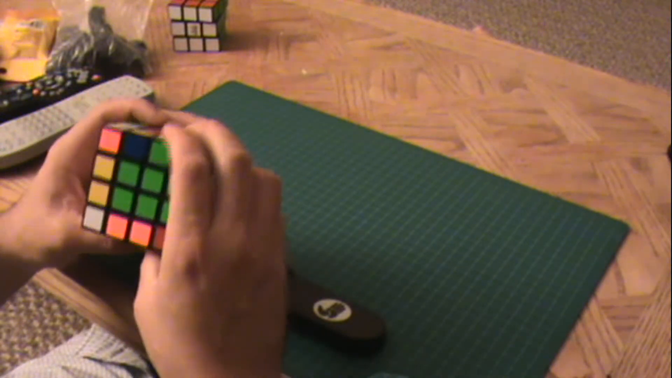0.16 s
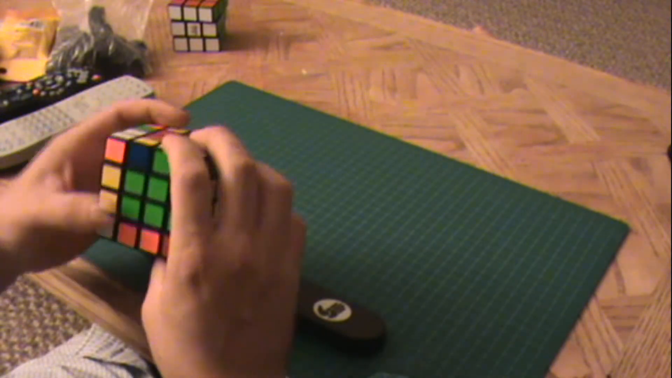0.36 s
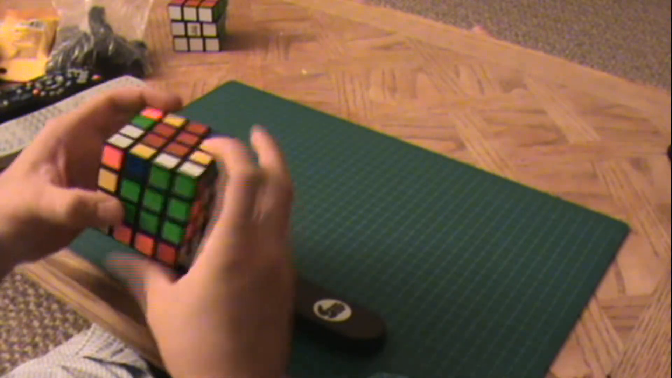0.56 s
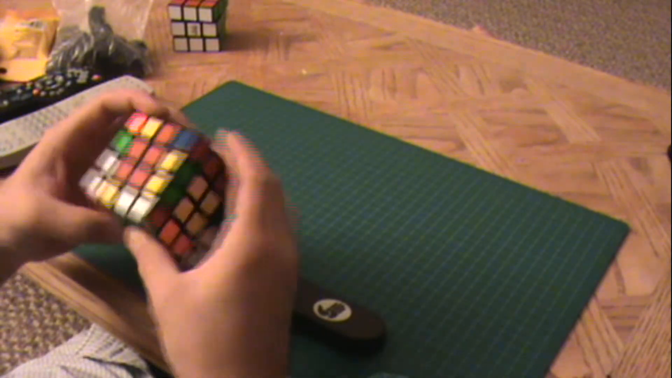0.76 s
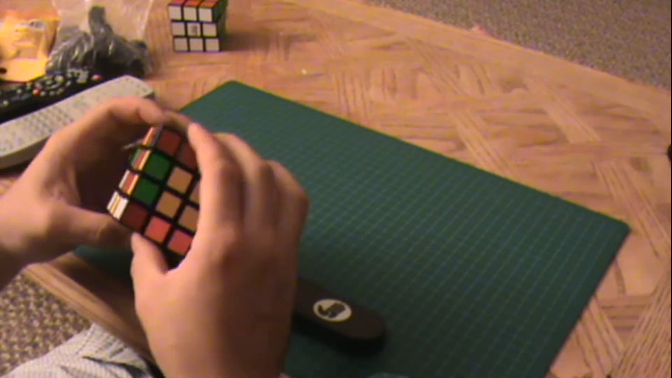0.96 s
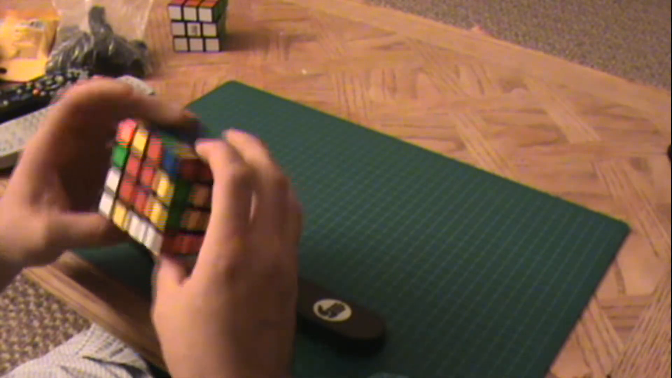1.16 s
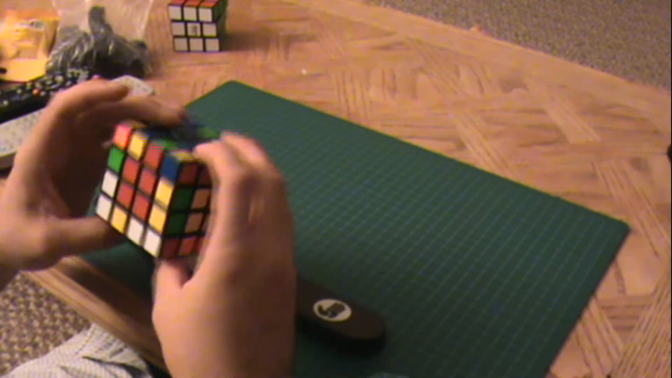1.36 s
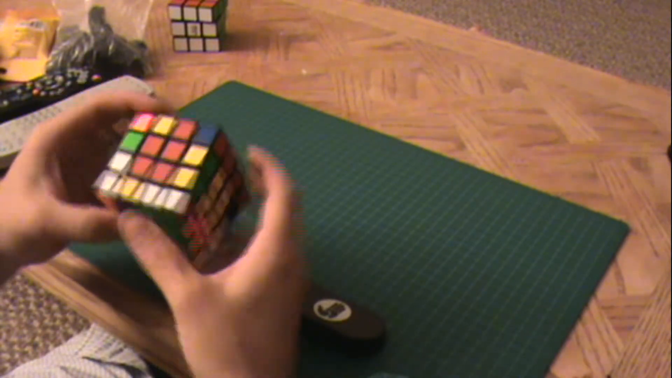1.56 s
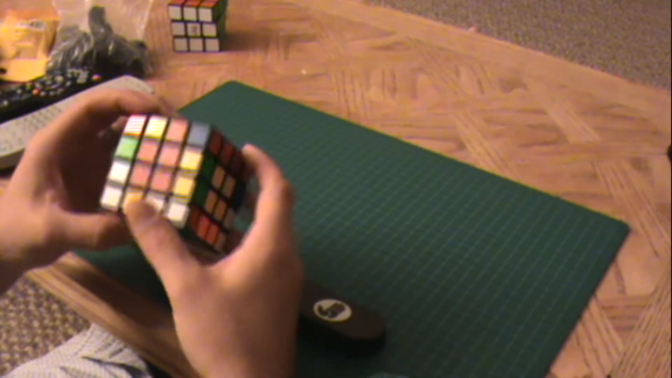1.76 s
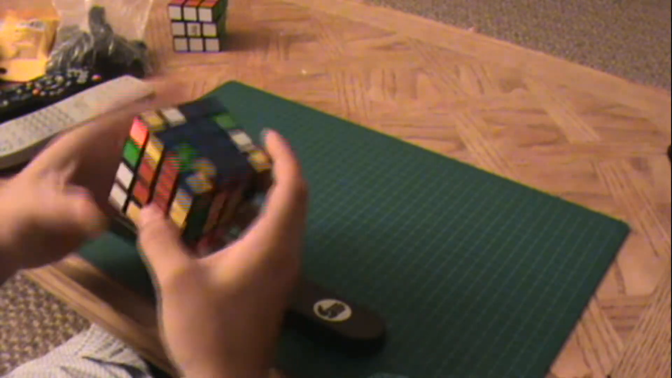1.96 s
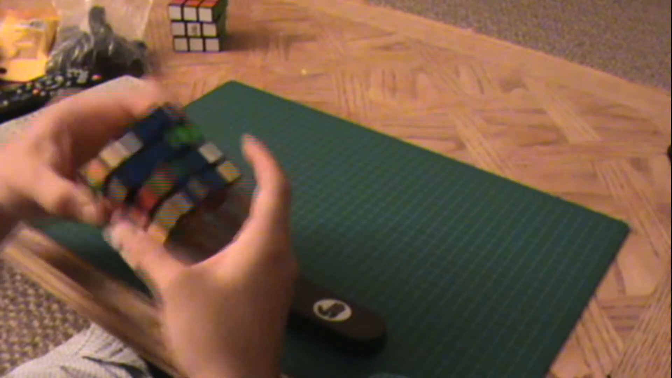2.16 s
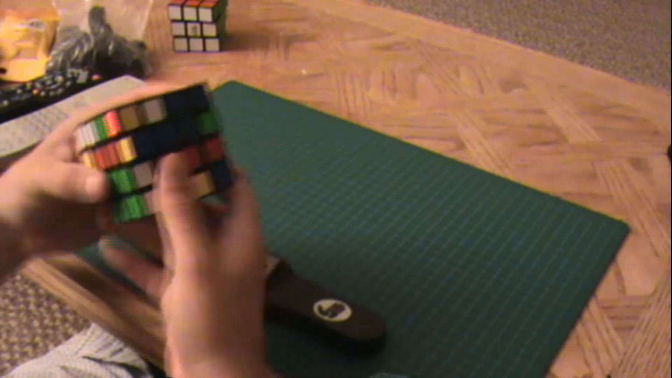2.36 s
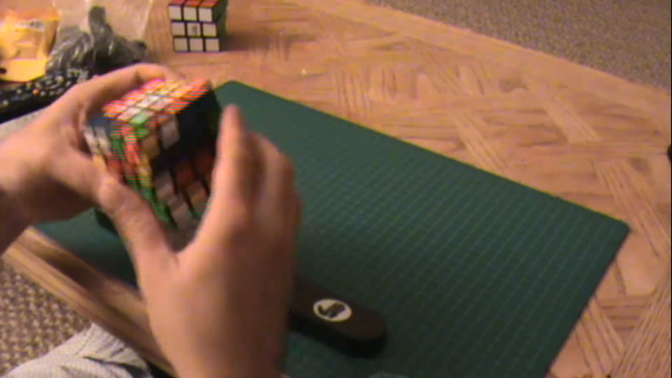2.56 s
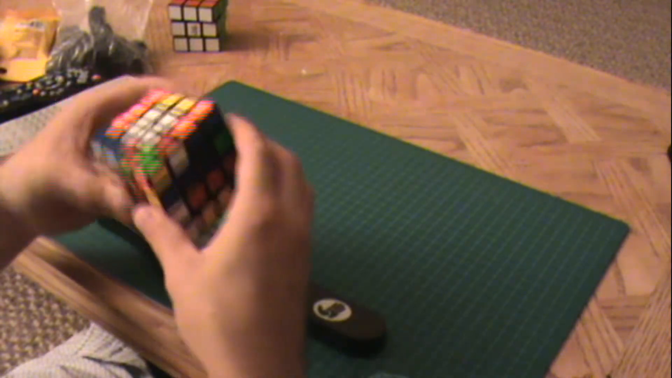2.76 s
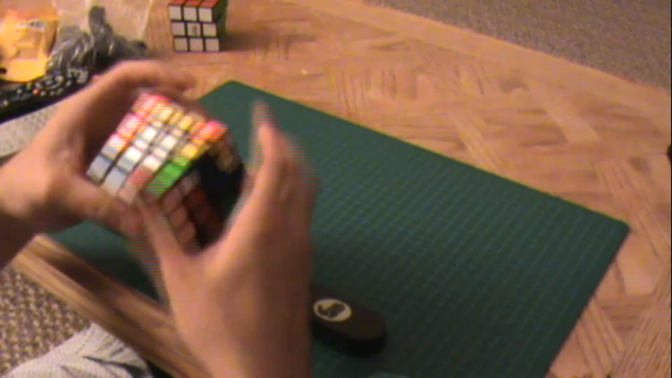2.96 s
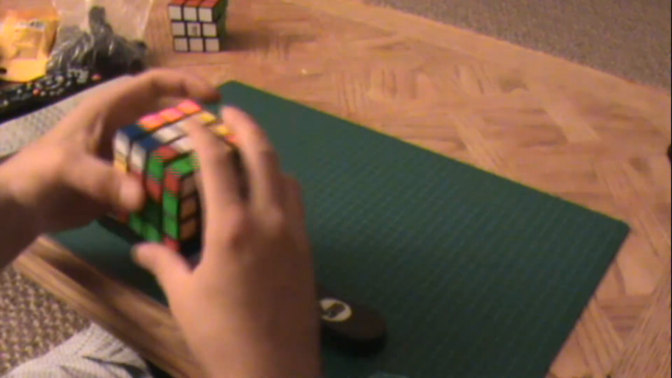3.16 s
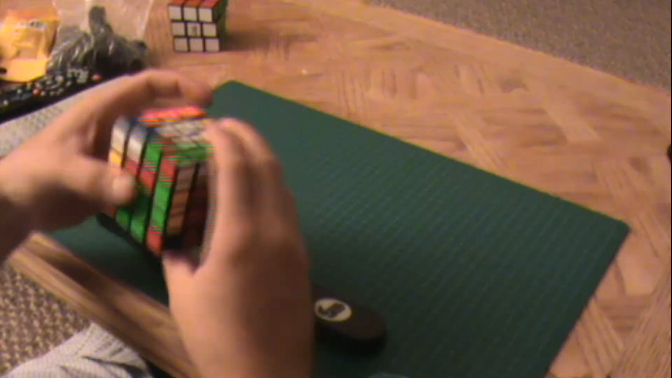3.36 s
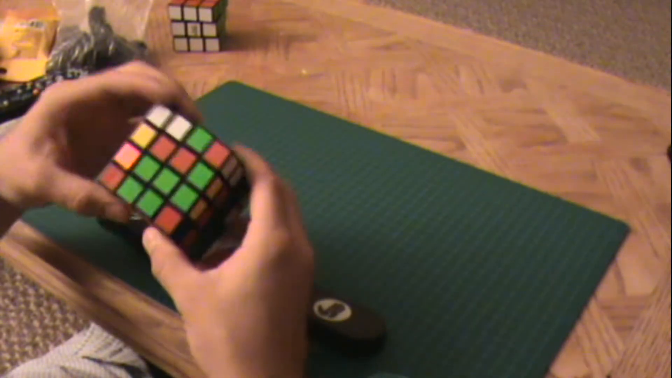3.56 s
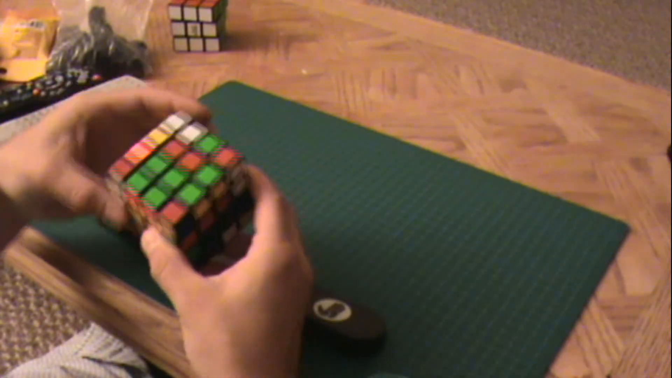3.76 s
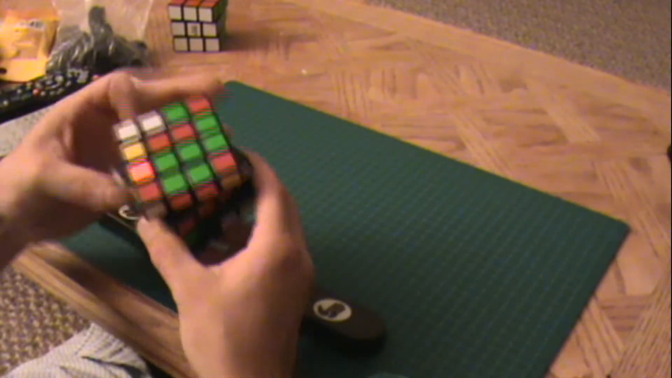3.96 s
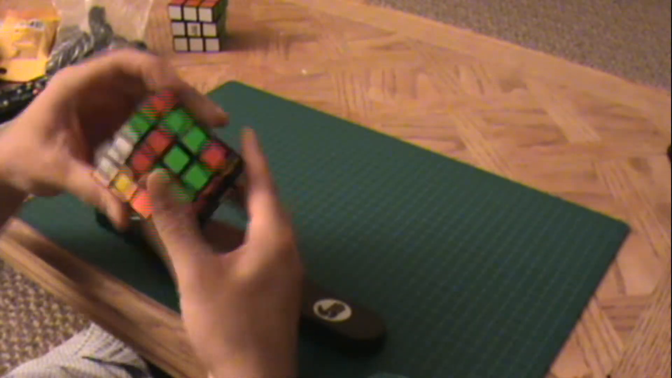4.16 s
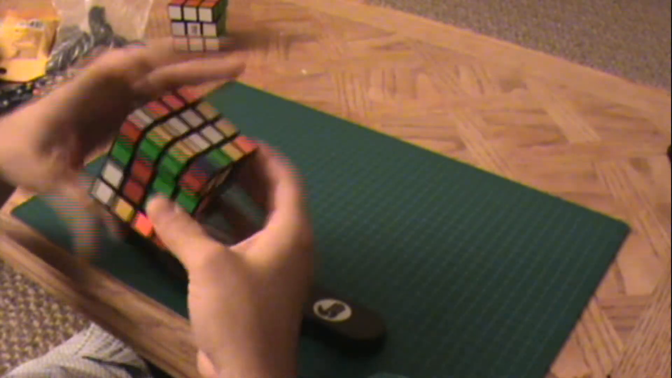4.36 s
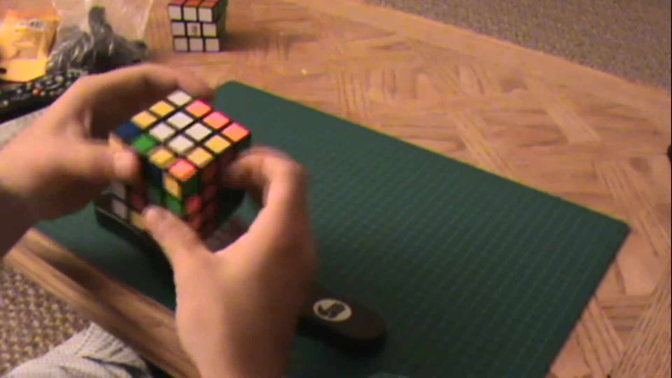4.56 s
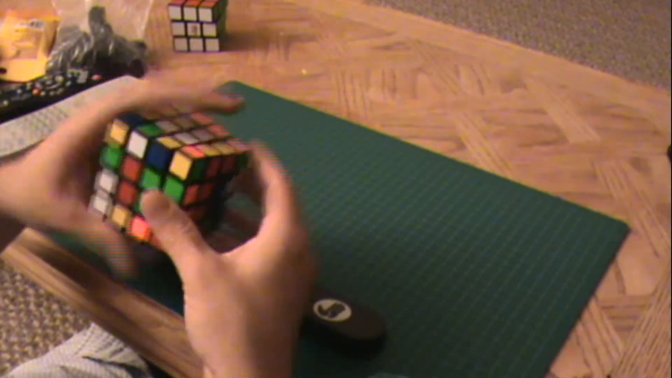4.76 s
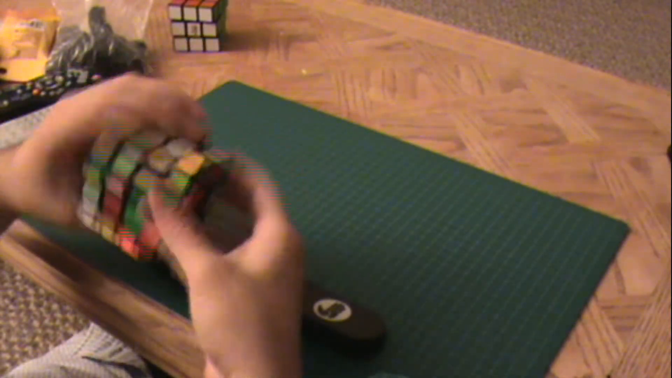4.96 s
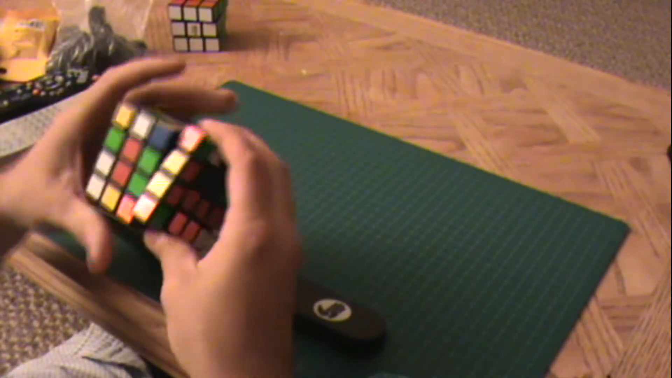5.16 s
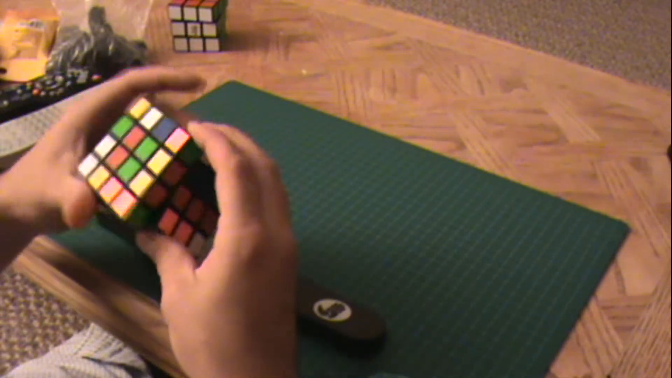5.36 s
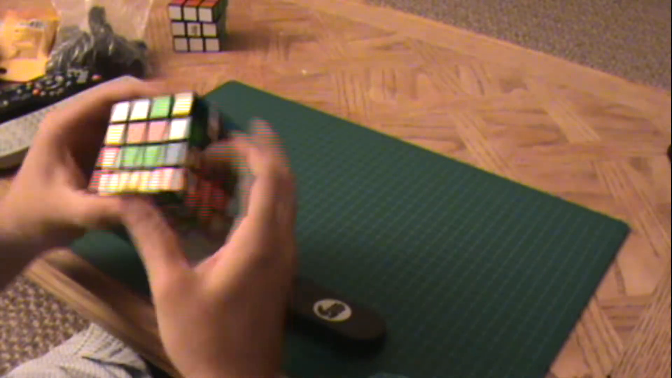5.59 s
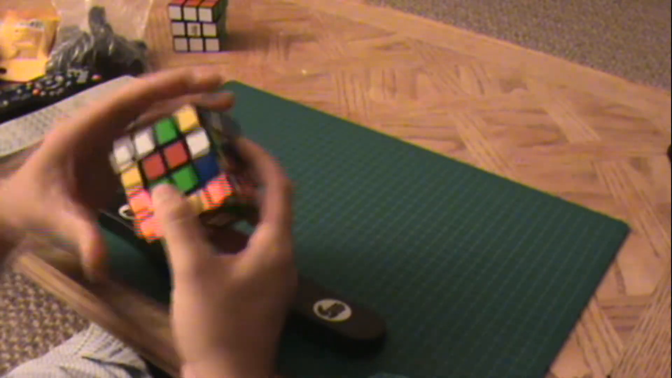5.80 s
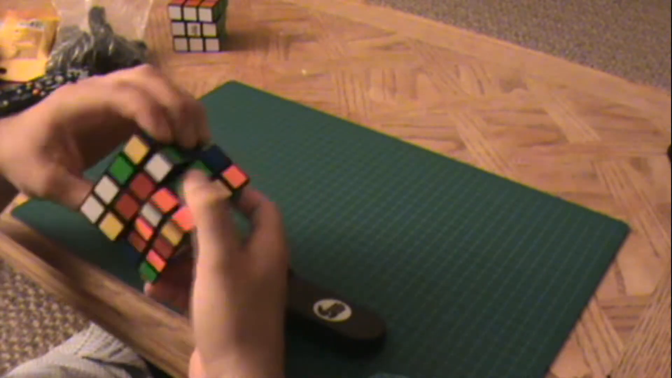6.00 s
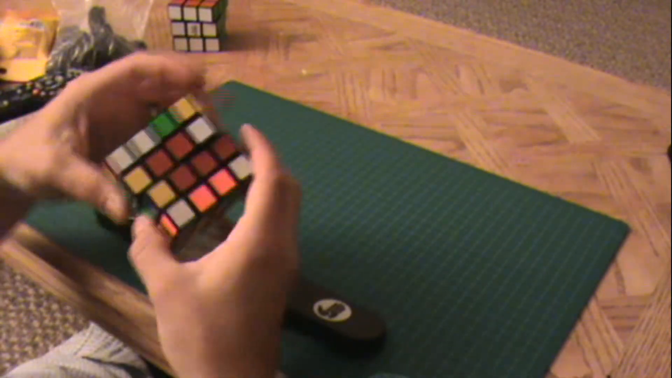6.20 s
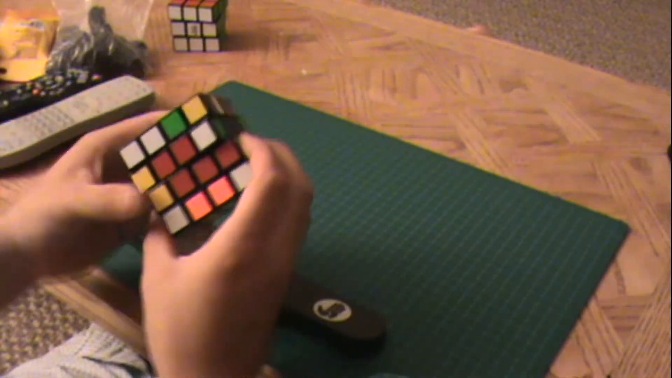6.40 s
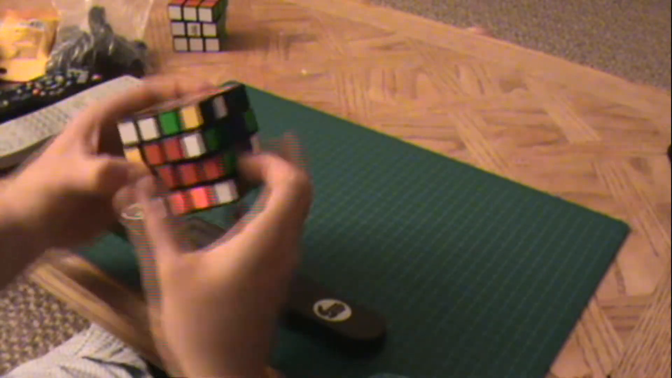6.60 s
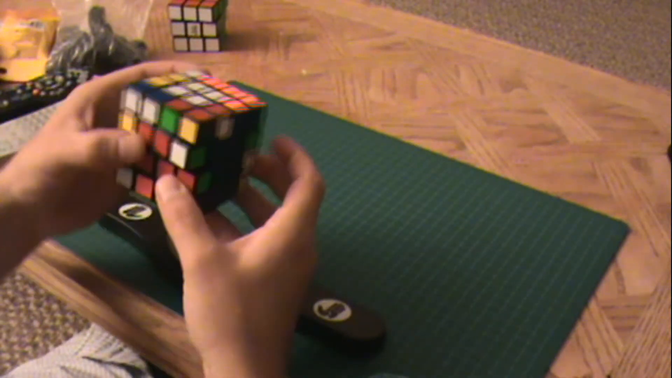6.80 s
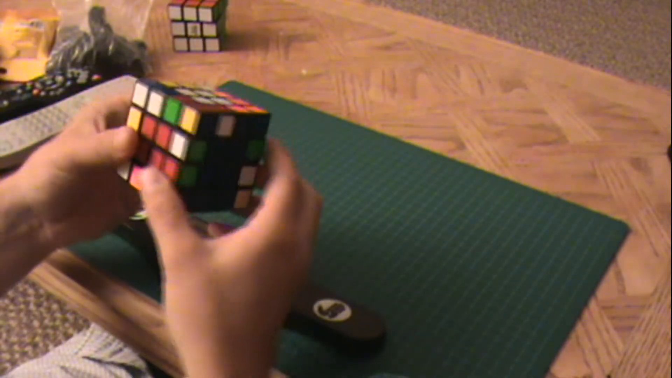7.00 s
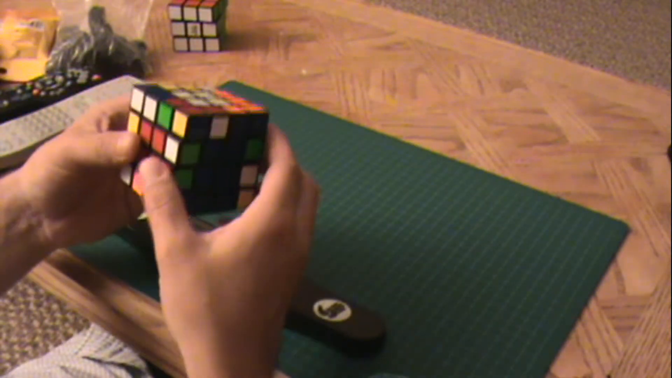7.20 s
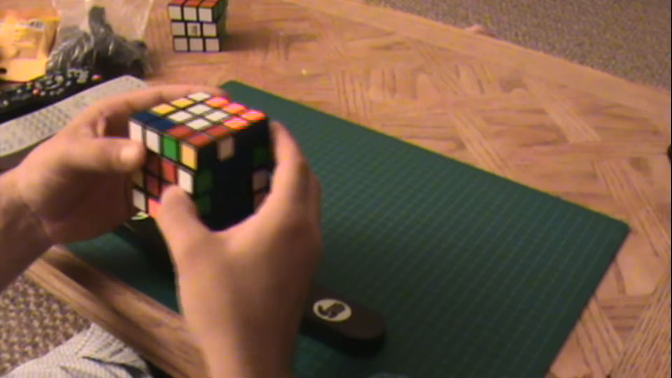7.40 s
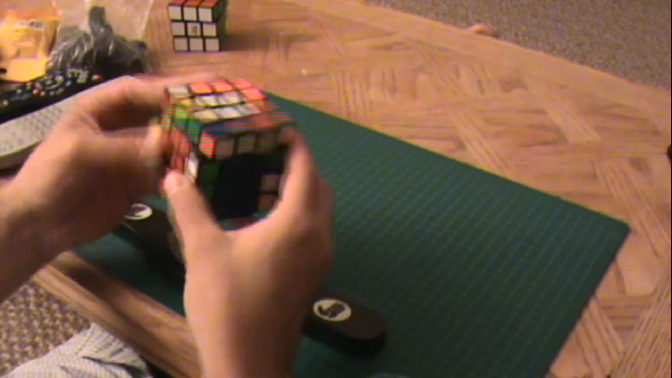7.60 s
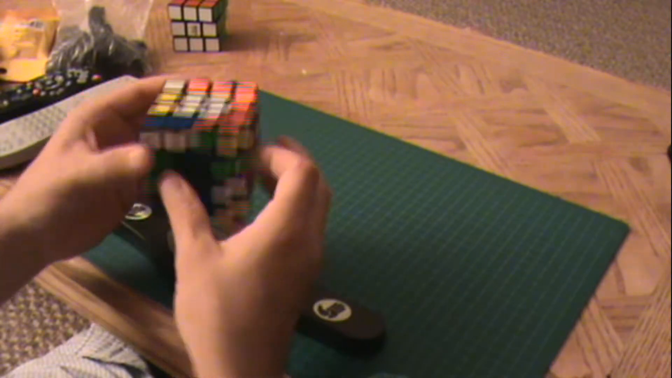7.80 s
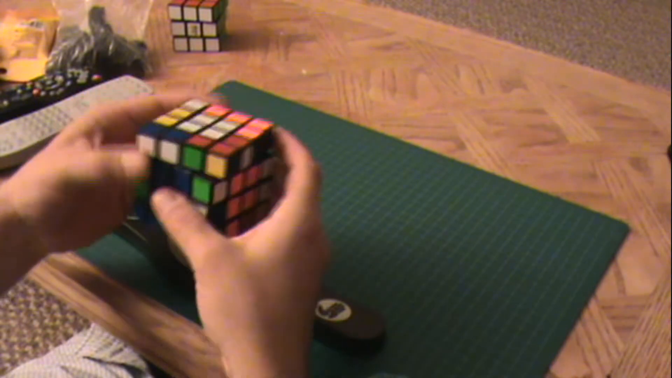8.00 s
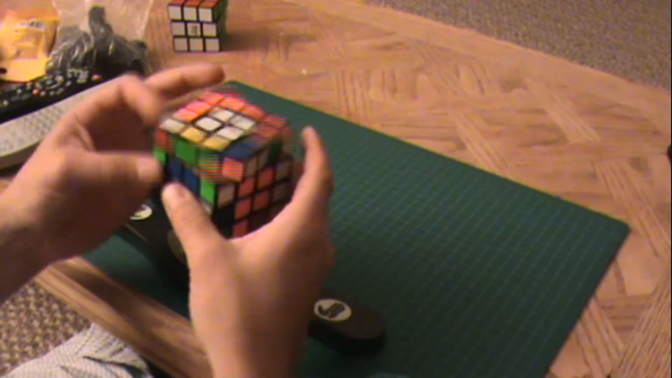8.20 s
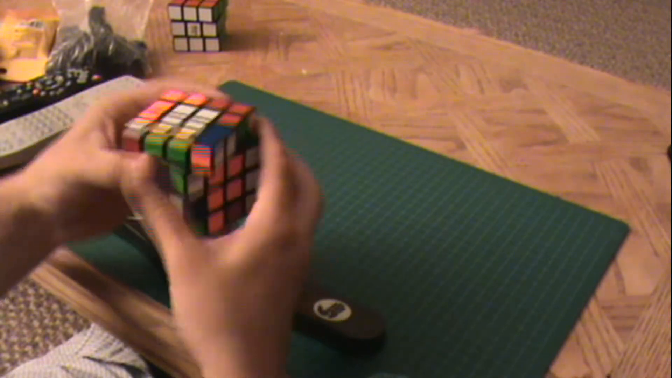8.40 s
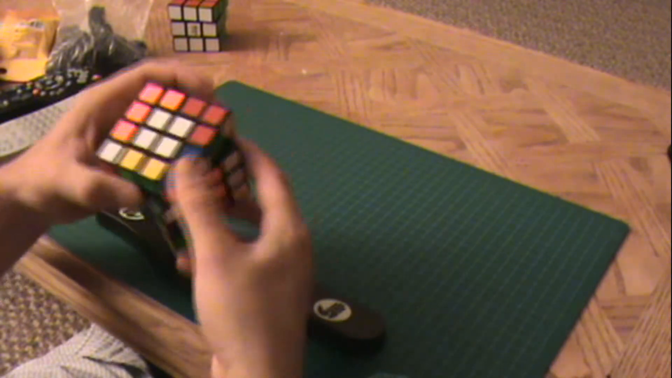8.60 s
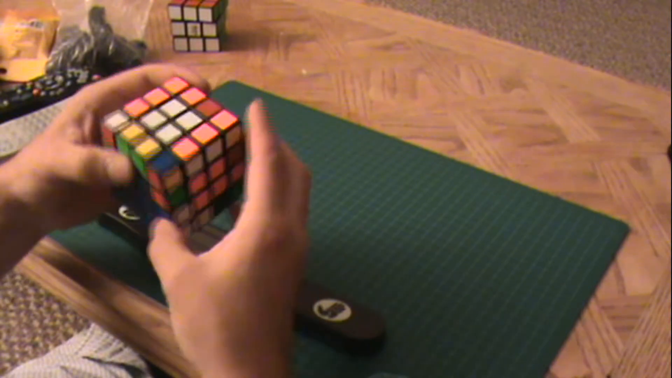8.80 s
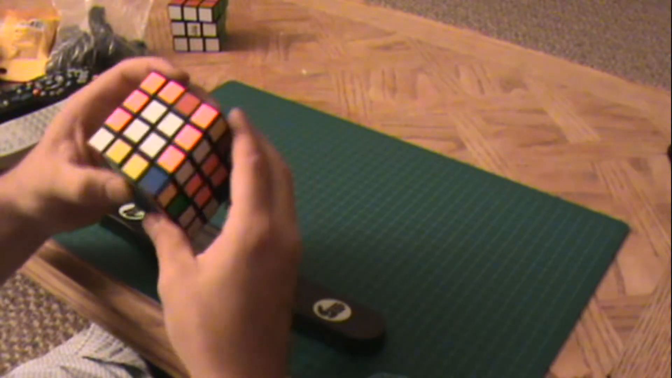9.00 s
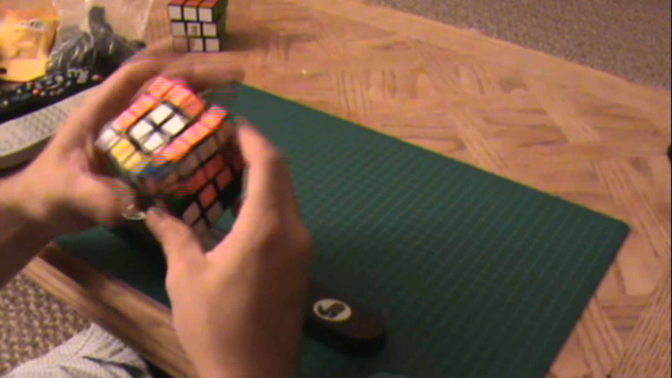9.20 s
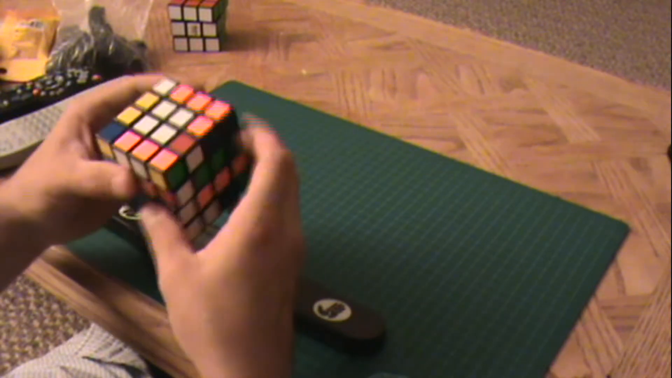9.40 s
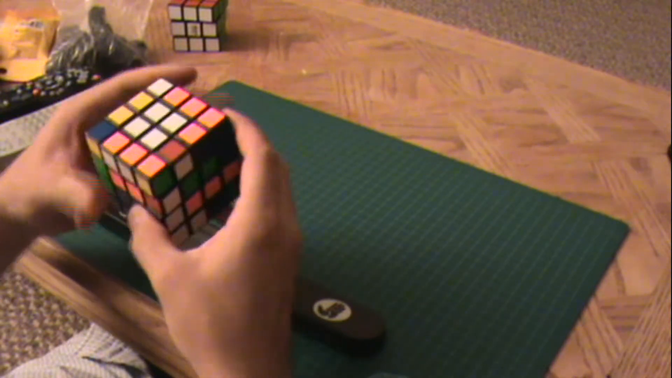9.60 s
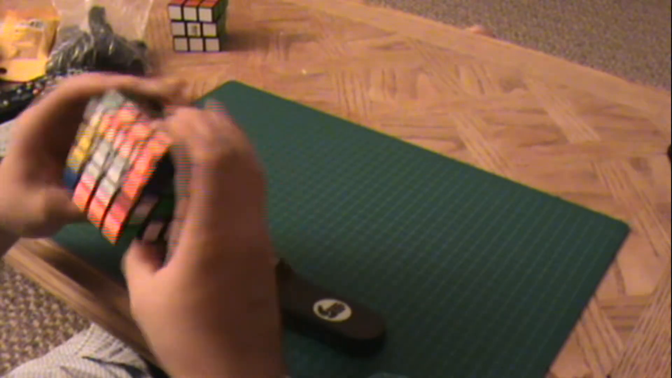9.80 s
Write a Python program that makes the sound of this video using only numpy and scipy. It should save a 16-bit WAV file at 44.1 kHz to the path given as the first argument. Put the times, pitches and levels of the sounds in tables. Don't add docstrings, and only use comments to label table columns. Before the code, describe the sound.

A plastic puzzle cube is turned by hand about half a metre from a stereo microphone in a small, quiet carpeted room. For the first 0.7 s there are only tiny ticks and soft finger rubbing; a sharp snap comes at about 0.75, then lighter clicks until 2. Clacks cluster at 2.1-2.25 and harder at 2.9, with single snaps near 3.15 and 3.45. Tight bursts follow around 3.95, 4.5 (strong), 4.85-5.1 and 5.4, with a dull finger rub near 5.6, then a rapid run at 6.0-6.2. From 6.3 to 7.6 it is mostly faint ticks and pats. A loud cluster hits at 7.65, others at 8.25, 8.5 and 8.75, a sharp crack at 9.3, then light clicks to the end. Bright short snaps mix with hollow knocks, brief pings and rattles. Short echoes, steady low hum, airy hiss and a faint, very high whine remain underneath.

```python
import sys
import numpy as np
from scipy import signal
from scipy.fft import rfft, irfft
from scipy.io import wavfile
from scipy.ndimage import uniform_filter1d

SR = 44100
rng = np.random.default_rng(int(sys.argv[2]) if len(sys.argv) > 2 else 0)


def boost(x):
    u = np.asarray(x, float) / 20
    return 10 ** u


def materialize(psi):
    bounded = np.clip(np.atleast_2d(psi).T, -1, 1)
    quanta = np.round(bounded * 32767).astype(np.int16)
    wavfile.write(sys.argv[1], SR, quanta)


N = 434385

# f/Hz, level/dB
SNAP_COLOUR = [(1300, -18.5), (2500, -11.5), (4500, -4.5), (8000, -5.5), (11000, -11.5), (13500, -22),
               (16000, -25)]
CLACK_MS = 2.3


def on_log(table, hz):
    table = np.array(table, float)
    return np.interp(np.log(np.maximum(hz, 1)), np.log(table[:, 0]), table[:, 1])


def shape(x, response):
    size = x.shape[-1]
    hz = np.arange(size // 2 + 1) * SR / size
    return irfft(rfft(x) * response(hz), size)


def level(x, db):
    return x * boost(db) / np.sqrt(np.mean(x ** 2))


def diffuse(size, narrow_db):
    # f/Hz, side minus mid/dB
    width = [(60, -18), (120, -12), (200, -3), (700, 3.5), (2400, 1.9), (8000, -2), (15000, 1)]
    mid, side = rng.standard_normal((2, size))
    side = shape(side, lambda hz: boost(on_log(width, hz) - narrow_db))
    return np.array([mid + side, mid - side])


def place_at(s, sounds):
    out = np.zeros(N + 2000)
    starts = (s[:, None] * SR).astype(int)
    np.add.at(out, starts + np.arange(sounds.shape[1]), sounds)
    return out[:N]


def rings(colour, tilt_db, spread_s, count, size, tau_s):
    t = np.arange(size) / SR
    pitch, late, strength = rng.random((len(tilt_db), 3, count, 1)).transpose(1, 0, 2, 3)
    place = (np.arange(count)[:, None] + pitch) / count
    lowest_hz, highest_hz = colour[0][0], colour[-1][0]
    hz = lowest_hz * (highest_hz / lowest_hz) ** place
    age = np.maximum(t - spread_s[:, None, None] * late, 0)
    tilt = tilt_db[:, None, None] * (place - .5)
    gain = boost(on_log(colour, hz) + tilt + 11.5 * (strength - .5))
    decay = np.exp(-age / tau_s * 3 ** (place - .5))
    ring = (gain * decay * np.sin(2 * np.pi * hz * age)).sum(axis=1)
    peak_power = uniform_filter1d(ring ** 2, size=60).max(axis=1, keepdims=True)
    return ring / np.sqrt(2 * peak_power)


def struck(table, ratios, tau_s, gain_db):
    s, db, hz = np.transpose(table)
    t = np.arange(600) / SR
    ring = sum(np.sin(2 * np.pi * ratio * hz[:, None] * t) for ratio in ratios)
    onset = np.minimum(t / .00034, 1)
    return place_at(s, boost(db + gain_db)[:, None] * ring * np.exp(-t / tau_s) * onset / 2)


def background():
    # f/Hz, level per Hz/dB
    air = [(20, -7.5), (50, 1.5), (120, -6), (500, -10), (1800, -12.5), (5500, -18.5), (10000, -22.5),
           (16000, -23.5)]
    # level/dB, side level/dB, waver (0-1)
    tone_levels = [(-65.5, -18, .2), (-68.5, -16, .25), (-71.5, -5, .15), (-72, -5, .15), (-77, -5, .15),
                   (-65.5, 2.5, .06), (-75, 2.5, .15)]
    tone_hz = [
        70.0,
        120.0,
        350,
        409,
        840,
        15735,
        15722.2,
    ]
    sound = level(shape(diffuse(N, narrow_db=-0.5), lambda hz: boost(on_log(air, hz))), -55.5)
    t = np.arange(N) / SR
    for hz, (db, side_db, waver) in zip(tone_hz, tone_levels):
        drift = uniform_filter1d(rng.standard_normal((2, N)), size=2000)
        drift = uniform_filter1d(drift, size=2000)
        strength = np.sqrt(2) * boost(db) * (1 + waver * drift / drift.std())
        mid, side = strength * np.sin(2 * np.pi * hz * t + np.array([[0], [1.3]]))
        sound = sound + mid + boost(side_db) * side * np.array([[1], [-1]])
    return sound


def fingers():
    # t/s, drag level/dB
    handling = [(0, -56), (.35, -60), (.72, -44.5), (1.3, -51), (1.9, -83), (2.9, -48), (3.25, -50),
                (3.801, -70), (4.4, -45.5), (5.05, -57), (5.3, -72), (5.58, -39), (5.85, -85), (6.15, -46),
                (6.5, -85), (7.6, -62), (9.1, -62), (9.85, -68)]
    rub = shape(diffuse(N, narrow_db=10), lambda hz: 1 / (1 + 9j * (hz / 320 - 320 / (hz + 1)) / 11) ** 2)
    grip = np.repeat(rng.standard_normal(N // 900 + 1), 900)[:N]
    grip = uniform_filter1d(grip, size=900)
    drag_db = np.interp(np.arange(N) / SR, *np.transpose(handling))
    return level(rub, 0) * boost(2.2 * grip + drag_db - 15)


def hits():
    # t/s, level/dB, hollow knock over snap/dB, brightness/dB
    cracks = [(.756, -25.5, -18, 16), (0.7656, -22, -39, 6), (1.1949, -31.5, -2, 12),
              (1.5557, -31.5, -19, 9), (1.966, -30, -21, 7), (2.208, -24, -26, 12),
              (2.2125, -19.5, -31, 12), (2.617, -28.5, -32, 3), (2.8541, -29, -11, 0),
              (3.1562, -19.5, -30, 20), (3.895, -25, -8, -3), (3.956, -20.5, -26, -3),
              (3.9789, -19, -26, 25), (4.7416, -20, -39, 12), (4.8537, -20.5, -16, 8),
              (4.855, -21.5, -27, 18), (4.9611, -28, -12, 1), (5.0276, -22.5, -24, -6),
              (5.964, -26.5, -28, -6), (6.464, -29.5, -6, 7), (7.632, -24, -12, -5), (7.664, -11.5, -29, 4),
              (7.8292, -27, -31, 3), (8.2434, -19, -19, -6), (8.4664, -28.5, -6, 6), (8.629, -27.5, -29, 8),
              (8.996, -30.5, -30, -2), (9.2766, -27, -21, -1), (9.3232, -16.5, -38, 30),
              (9.481, -31.5, -5.5, 12)]
    # t/s, level/dB, hollow knock over snap/dB, brightness/dB
    clack_events = [(2.0937, -26.5, -9, 3), (2.2271, -23.5, -11, 3), (2.247, -19, -2, 1.5),
                    (2.867, -19.5, -25, -3), (2.893, -13, -26, 8), (2.923, -14.5, -3.5, 4),
                    (3.4285, -23, -3, 1), (3.9648, -15.5, -14, 12), (4.4861, -18, -10, 12),
                    (4.4926, -13, -5.5, 11), (4.5118, -11.5, -4.5, 10), (4.5282, -12.5, -10.5, 4),
                    (4.8595, -22.5, -8.5, 3), (5.055, -13.5, -25, -2), (5.0809, -14, -22, 6),
                    (5.137, -21, -6, -3), (5.4262, -16, -7.5, 5.5), (5.9951, -24, -8, -7),
                    (6.0227, -19, 2.5, -6.5), (6.138, -16, -5, 7), (6.161, -12, -21, 3.5),
                    (6.1761, -21, -33, -29), (6.202, -20, -23, 6), (8.2241, -20.5, -11, 1),
                    (8.2499, -15, -5.5, 5), (8.2751, -21.5, -7, 6.5), (8.4895, -21, -12.5, 6),
                    (8.7386, -20.5, -23, 1), (8.7574, -14, -2.5, 11), (8.7696, -13, -30, 11.5)]
    # t/s, level/dB, hollow knock over snap/dB, length/ms
    scuffles = [(1.6124, -34.5, -8, 5.4), (1.9709, -25, -3.5, 4), (2.8606, -25, 1, 3.4),
                (2.9102, -17, 1.5, 3.84), (3.1709, -26.5, -1, 2.75), (3.9404, -30.5, 4.5, 10.7),
                (3.9811, -27.5, 7, 6.9), (4.1623, -33, 1, 1.9), (4.496, -20, -18, 5.5),
                (4.5177, -25, -3, 5.8), (4.8644, -21, -8, 5.6), (4.9186, -23, -1.5, 3.8),
                (5.0653, -17, -14, 2), (5.1, -18.5, -7.5, 7.3), (5.5084, -23, -1.5, 4.56),
                (5.5359, -27.5, -10, 7.4), (5.6438, -31, -2, 3.6), (5.7718, -30.5, -26, 4.4),
                (5.979, -29.5, -3, 4), (6.0001, -28.5, -1, 5.9), (7.6439, -17.5, -3, 4.6),
                (7.689, -13.5, -7.5, 4.5), (7.7012, -16.5, -22, 4.6), (8.232, -27.5, -9, 6.4),
                (8.7279, -34, -1, 6.7), (9.3275, -21.5, -6, 6.5), (9.7948, -30, -10, 6.5)]
    # t/s, level/dB, brightness/dB
    taps = [(1.7033, -32, -9), (1.8597, -37.5, 14), (2.1373, -30, -4), (2.19, -34.5, -10),
            (2.465, -33.5, 0), (3.453, -24, 16), (3.696, -35, -2), (3.7467, -35, -10), (3.8337, -31.5, -24),
            (3.9275, -30, -1), (4.158, -32, 8), (4.6186, -25, 1), (4.7022, -35, -7), (4.743, -25.5, 1),
            (4.8352, -34, -9), (5.223, -32.5, -8), (5.391, -27, 4), (5.633, -35, 11), (5.671, -30.5, 14),
            (5.749, -32, 0), (5.7946, -24, 3), (5.9906, -27.5, -22), (6.311, -33.5, -12), (7.6202, -36, -9),
            (7.8994, -32, 3), (8.2851, -24, -7), (9.309, -28.5, -12), (9.3189, -25.5, 13),
            (9.4166, -31.5, -5), (9.625, -32, -6)]
    # t/s, level/dB
    ticks = [(0.269, -41), (0.305, -42.5), (0.444, -36), (.487, -37.5), (1.267, -39), (1.3213, -36),
             (1.4755, -45), (1.673, -37), (1.9251, -40), (2.047, -36.5), (2.4968, -36), (2.572, -36.5),
             (2.772, -40), (3.2939, -35.5), (3.8115, -41.5), (4.255, -34.5), (4.4175, -35), (5.7617, -50),
             (6.451, -39.5), (6.683, -35), (6.7457, -39.5), (6.8899, -37), (6.9733, -36.5), (7.5172, -44),
             (7.964, -35.5), (8.0254, -34), (8.7, -46), (9.2667, -33.5), (9.6782, -35.5), (9.765, -36.5)]
    # t/s, level/dB, brightness/dB
    more_ticks = [(0.6145, -44, -4), (0.6617, -41.5, -30), (.7424, -57, -8), (1.1616, -61, 13),
                  (1.5097, -56, 11), (1.599, -54, -14), (1.6202, -31.5, 26), (2.439, -40, -2),
                  (2.4893, -43, -6), (2.584, -41, 3), (2.6854, -40, -10), (3.65, -48, -2), (3.762, -38, 8),
                  (3.8772, -38, -2), (4.269, -48, 1), (4.436, -35.5, -18), (5.2763, -48, 10), (5.936, -45, -14),
                  (6.8439, -42.5, -7), (7.325, -47, -5), (7.4608, -46, -4), (7.528, -37, -9),
                  (7.565, -40.5, -13), (8.1155, -40.5, 7), (8.8975, -46, -10), (8.931, -43, -10),
                  (8.9612, -41.5, -11), (9.0817, -44, -13), (9.257, -47, -12), (9.5626, -49, 10)]
    # t/s, level/dB
    pats = [(.2468, -42.5), (0.3322, -43), (0.5558, -43), (.688, -41), (1.9376, -37.5), (2.4008, -39.5),
            (2.4306, -39.5), (2.515, -40), (2.7128, -43), (2.842, -37), (3.6264, -40), (3.6703, -36.5),
            (4.139, -41.5), (4.426, -38.5), (5.4105, -37), (6.586, -42.5), (6.7322, -37.5), (6.799, -46),
            (7.027, -39.5), (7.365, -45), (7.8833, -40), (8.029, -34.5), (8.197, -35.5), (8.4097, -38.5),
            (8.6779, -42), (9.101, -45), (9.1643, -38), (9.185, -40), (9.5864, -42), (9.7085, -40.5)]
    crack_ms, tap_ms, tick_ms = 0.443, 1.63, 0.772
    tap_knock_db, tick_knock_db, pat_knock_db = -5, -5, 0
    tick_bright_db, pat_bright_db = 1, -9
    rows = [(*row, crack_ms) for row in cracks]
    rows += [(*row, CLACK_MS) for row in clack_events]
    rows += [(s, db, knock_db, 44 + 1.78 * db, ms) for s, db, knock_db, ms in scuffles]
    rows += [(s, db, tap_knock_db, bright_db, tap_ms) for s, db, bright_db in taps]
    rows += [(s, db, tick_knock_db, tick_bright_db, tick_ms) for s, db in ticks]
    rows += [(s, db, tick_knock_db, bright_db, tick_ms) for s, db, bright_db in more_ticks]
    rows += [(s, db, pat_knock_db, pat_bright_db, tap_ms) for s, db in pats]
    return np.transpose(rows)


def slide():
    # start t/s, length/s, rattle level/dB
    scrapes = [
        (0.226, 0.11, -71),
        (2.393, 0.58, -75),
        (3.644, 0.39, -71),
        (4.155, 0.22, -57.5),
        (5.57, 0.14, -55),
        (8.65, 0.14, -56),
        (9.56, 0.15, -68),
    ]
    rattle_db, fidget_db = -34, -94
    lead_s, fall_s, follows = .005, 0.046, 0.83
    when, strength = rng.random((2, 2500))
    when = when * N / SR
    s, db = hits()[:2]
    age = when[:, None] - s
    nearness = np.exp(-np.maximum(age / fall_s, -age / lead_s) * 2)
    shaken = (boost(db) ** 2 * nearness).sum(axis=1) ** (follows / 2)
    size = boost(rattle_db) * shaken + boost(fidget_db)
    for start, length, drag_db in scrapes:
        progress = np.clip((when - start) / length, 0, 1)
        size = size + boost(drag_db) * np.sin(np.pi * progress) ** .5
    small_ticks = rings(SNAP_COLOUR, 0 * when - 4, 0 * when + 0.000865, count=10, size=160, tau_s=0.00015)
    size = size * (1.01 - strength) ** -.22
    return 3 * place_at(when, small_ticks * size[:, None])


def pings():
    # t/s, level/dB, f/Hz
    loose_faces = [(.7661, -25.5, 4380), (1.8599, -33, 3200), (3.453, -26, 8840), (4.6185, -29.5, 3750),
                   (6.889, -36, 5200), (3.922, -33, 840), (.81, -42, 700), (8.4908, -17.5, 5050),
                   (8.5, -33, 5800), (8.513, -31, 5250), (8.532, -38, 4300), (8.475, -38, 4700),
                   (7.083, -53, 1800), (7.235, -53, 1650), (1.703, -33, 600), (5.4258, -27, 560),
                   (8.49, -27.5, 600), (7.688, -19.5, 1620)]
    # t/s, level/dB, f/Hz
    chimes = [(2.0921, -22, 6080), (2.2264, -21, 4440), (2.2483, -12, 4470), (2.8659, -9, 4920),
              (2.8928, -9, 4910), (2.9098, -16, 8100), (2.9224, -12, 5140), (3.1537, -12, 8510),
              (3.4276, -6, 9500), (3.9644, -7, 4630), (4.4927, -13, 4700), (4.4984, -6, 8570),
              (4.5111, -10, 6450), (4.5274, -11, 7960), (4.7401, -13, 6370), (4.8584, -9, 5130),
              (4.9207, -16, 7100), (5.0549, -9, 6170), (5.0799, -9, 8200), (5.0994, -12, 1400),
              (5.4261, -13, 4380), (5.5079, -19, 2090), (6.0222, -8, 4910), (6.1379, -5, 5760),
              (6.1604, -8, 5600), (6.1754, -16, 3530), (7.643, -16, 7520), (7.664, -10, 8900),
              (7.6879, -4, 5600), (7.7034, -10, 7500), (8.2237, -17, 1740), (8.2496, -13, 5630),
              (8.7575, -8, 8430), (8.7695, -8, 6230), (9.3232, -19, 5430)]
    # t/s, level/dB, f/Hz
    flecks = [(0.4926, -35, 8180), (0.7419, -40, 5810), (1.4684, -41, 5940), (1.5514, -35, 4570),
              (1.5972, -37, 6030), (2.3435, -32, 3530), (2.3627, -43, 3400), (2.3768, -44, 1890),
              (2.4448, -38, 3880), (2.7633, -34, 4050), (2.7759, -29, 4050), (3.0192, -32, 6760),
              (3.0517, -38, 5600), (3.2526, -43, 4910), (3.2636, -42, 1510), (3.2768, -42, 1720),
              (3.4117, -45, 2670), (3.6145, -44, 1680), (3.811, -34, 8570), (3.8905, -34, 4740),
              (4.1138, -44, 2150), (4.1307, -39, 1510), (4.1907, -34, 3660), (4.2023, -32, 3920),
              (4.2446, -37, 1850), (4.25, -34, 4610), (4.27, -40, 7410), (4.3913, -35, 1890),
              (4.4047, -34, 1510), (4.413, -40, 1510), (4.4213, -36, 2410), (5.0129, -33, 2070),
              (5.0199, -33, 3190), (5.1662, -23, 2630), (5.4182, -28, 5680), (5.6069, -38, 5510),
              (5.7339, -32, 4090), (5.7605, -26, 5770), (5.8019, -32, 2500), (6.1045, -22, 3620),
              (6.12, -33, 2410), (6.5465, -40, 2410), (7.0158, -35, 3880), (7.0218, -42, 1510),
              (7.031, -38, 1510), (7.165, -49, 5470), (7.2062, -47, 1510), (7.2984, -47, 5560),
              (7.6365, -27, 1680), (7.788, -28, 8740), (7.8259, -32, 1510), (8.0978, -40, 1720),
              (8.4457, -36, 3570), (8.657, -34, 4130), (8.6726, -31, 2580), (8.6998, -34, 8400),
              (9.2589, -37, 2020), (9.4634, -39, 7840), (9.6741, -36, 2540), (9.7154, -38, 1590)]
    # t/s, level/dB, f/Hz
    more_flecks = [(1.6966, -32, 1210), (2.0873, -38, 1210), (2.187, -39, 1640), (2.2041, -30, 1210),
                   (2.2492, -13, 4720), (2.2581, -25, 5730), (2.7605, -37, 2110), (3.1547, -15, 7160),
                   (3.2828, -41, 8270), (3.6482, -40, 2240), (3.9231, -33, 1210), (3.9621, -18, 2370),
                   (3.9779, -10, 4870), (4.1651, -24, 4090), (4.2698, -37, 7450), (4.3033, -38, 1210),
                   (4.4208, -36, 3790), (4.4985, -13, 3490), (4.7444, -19, 6370), (4.8598, -17, 6200),
                   (5.0131, -35, 2070), (5.0239, -33, 5730), (5.0338, -32, 1720), (5.0633, -15, 5940),
                   (5.1659, -23, 2630), (5.4407, -20, 6200), (5.6687, -27, 2410), (5.6735, -26, 7710),
                   (5.7987, -24, 4310), (5.8017, -29, 2450), (6.101, -36, 2890), (6.1252, -32, 1210),
                   (6.1354, -18, 3400), (6.1755, -12, 5510), (6.2853, -37, 4690), (6.4609, -35, 1210),
                   (6.8977, -37, 5680), (7.0214, -39, 1460), (7.6248, -33, 1210), (7.6367, -27, 1680),
                   (7.6702, -19, 5940), (7.8257, -33, 4010), (7.895, -34, 2840), (8.0229, -41, 3400),
                   (8.6723, -34, 5210), (9.1607, -41, 1210), (9.254, -36, 4010), (9.2587, -35, 1210),
                   (9.3057, -30, 4350), (9.616, -40, 1510), (9.6743, -36, 2540), (9.7154, -37, 1590)]
    close, wide = (.93, 1, 1.06), (.37, .62, 1, 1.31, 1.73)
    ringing = struck(loose_faces, close, tau_s=0.0024, gain_db=0)
    ringing = ringing + struck(chimes, close, tau_s=0.00097, gain_db=-11)
    ringing = ringing + struck(flecks, wide, tau_s=0.00056, gain_db=2)
    return ringing + struck(more_flecks, wide, tau_s=.0005, gain_db=0)


def all_round(sounds, size):
    spectrum = rfft(sounds, 1024)
    even = np.sqrt(uniform_filter1d(np.abs(spectrum) ** 2, size=size))
    return irfft(even * spectrum / (np.abs(spectrum) + 1e-9))


def clacks():
    # f/Hz, level/dB
    core_colour = [(220, -17), (400, -19.5), (750, 9), (1100, 3), (1700, -12.5)]
    s, db, knock_db, bright_db, scuffle_ms = hits()
    scuffle_s = np.clip(scuffle_ms, .2, 9) / 1000 + .0004

    snap = rings(SNAP_COLOUR, 1.8 * np.minimum(bright_db, 16), scuffle_s, count=56, size=600, tau_s=.0007)
    snap = boost(db)[:, None] * snap

    core_tilt_db = 12 * rng.standard_normal(len(s)) - 4
    knock = rings(core_colour, core_tilt_db, scuffle_s / 2, count=11, size=900, tau_s=.003)
    knock = boost(db + knock_db - 1.5)[:, None] * knock

    creak_gain = boost(db - 9) * np.minimum(scuffle_ms / CLACK_MS, 1)
    creak = rings(SNAP_COLOUR, bright_db + 3.0, 0 * s + 0.014, count=30, size=640, tau_s=0.00021)
    growth = np.minimum(np.arange(640) / SR / .003, 1)
    creak = creak_gain[:, None] * creak * growth

    snap_s = s - .0004
    front = place_at(snap_s, snap) + place_at(s, knock)
    spread = place_at(snap_s, all_round(snap, size=45)) + place_at(s, all_round(knock, size=14))
    return np.array([front, spread]) + place_at(s - .0045, creak)


def room(x):
    # delay t/s, left level/dB, right level/dB
    echoes = [
        (.0025, -17, -17),
        (.0087, -12, -7.5),
        (.0110, -19, -15),
        (.0175, -16, -11),
    ]
    # f/Hz, t/s
    fall_time = [(250, 0.29), (800, 0.22), (2000, 0.22), (5500, 0.21), (14000, 0.27)]
    # f/Hz, level/dB
    tail_start = [(250, -41.5), (700, -29.5), (2500, -30.5), (8000, -30.5), (14000, -40.5)]
    # f/Hz, lead/radians
    left_lead = [(60, .03), (260, .6), (690, 1.0), (1030, .7), (3300, .25), (10000, .03)]
    # f/Hz, left minus right/dB
    left_gain = [(150, -3.5), (600, 4), (2500, 3), (5000, 4), (12000, 2.5)]
    no_bass = signal.butter(4, 345, "high", fs=SR, output="sos")
    front, spread = signal.sosfilt(no_bass, x)

    t = np.arange(SR // 2) / SR
    noise, answer = diffuse(len(t), narrow_db=8), 0
    for hz in 125 * 2. ** np.arange(8):
        band = shape(noise, lambda f: np.cos(np.pi / 2 * np.clip(np.log2(np.maximum(f, 1) / hz), -1, 1)) ** 2)
        answer = answer + band * boost(on_log(tail_start, hz) - 60 * t / on_log(fall_time, hz))
    answer = answer * boost(np.array([[-1.2], [1.2]])) * np.clip((t - .0082) / 0.0022, .2, 1)
    for s, *db in echoes:
        answer[:, int(s * SR)] += boost(np.array(db))

    heard = front + signal.fftconvolve(spread[None], answer, axes=1)[:, :N]
    half = np.array([[.5], [-.5]])
    return shape(heard, lambda hz: boost(half * on_log(left_gain, hz)) * np.exp(1j * half * on_log(left_lead, hz)))


def scene():
    cube = clacks() + slide() + pings()
    return room(cube) + fingers() + background()


def roll_off(x):
    return signal.sosfilt(signal.butter(12, 16830, fs=SR, output="sos"), x)


def record(dry):
    top_cut = signal.ellip(8, .3, 45, 15850, fs=SR, output="sos")
    mix = signal.sosfilt(top_cut, dry)
    return roll_off(mix)


dry = scene()
out = record(dry)
materialize(out)
```